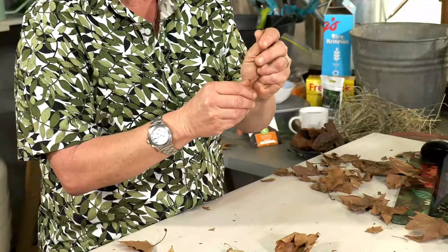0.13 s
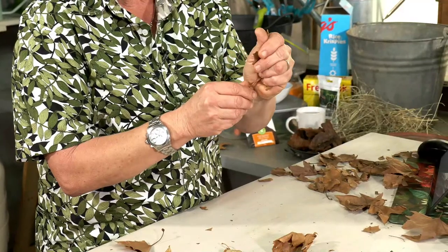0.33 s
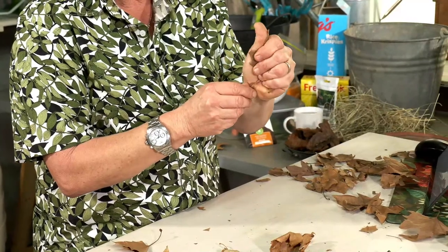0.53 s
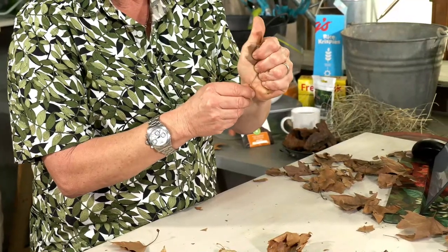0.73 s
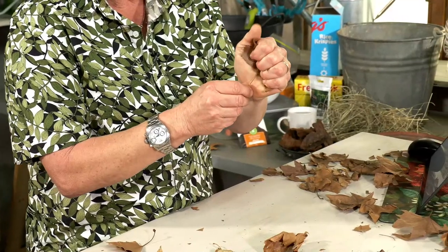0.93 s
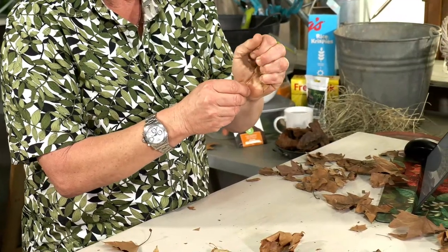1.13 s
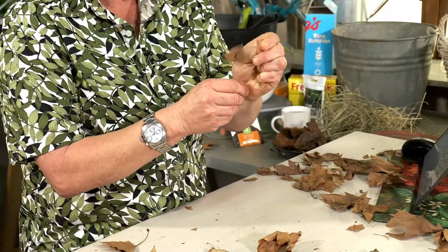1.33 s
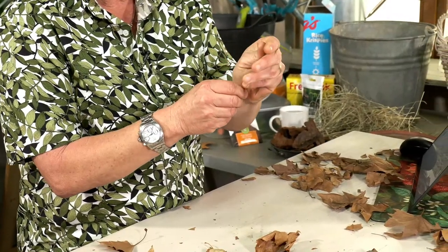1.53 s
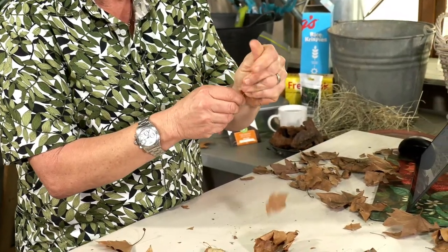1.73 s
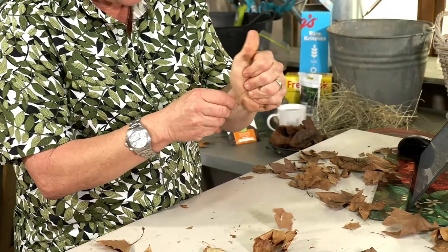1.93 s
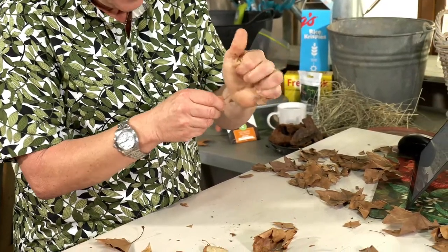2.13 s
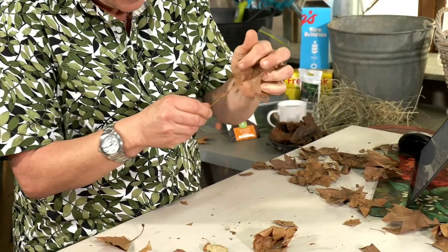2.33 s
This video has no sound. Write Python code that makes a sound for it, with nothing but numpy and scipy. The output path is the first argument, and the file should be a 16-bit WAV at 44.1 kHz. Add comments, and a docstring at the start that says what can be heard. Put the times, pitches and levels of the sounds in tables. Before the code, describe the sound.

Crisp, dense crackling of a dry leaf being crumbled by hand in a quiet room.

```python
"""A dry leaf is crushed and torn between the fingers, close to a small microphone in a quiet shed.
From the start, veins and blade snap over a dense fine crackle and faint hiss; each snap is a quick run of
fractures that rings the brittle leaf for a few ms. The snaps thin out after 0.65 s, bunch again near
1.1 s and 1.7 s and stop by 2.3 s; the crackle fades, with a last small break at 2.45 s.
Throughout, the microphone chain adds a dull overload pop per snap and a soft thump as the treble swells."""
import sys
import numpy as np
from scipy import signal
from scipy.fft import rfft, irfft
from scipy.io import wavfile

SR = 44100
rng = np.random.default_rng(int(sys.argv[2]) if len(sys.argv) > 2 else 0)


def master(y):
    """Save y as 16-bit WAV."""
    cut = np.clip(np.atleast_2d(y).T, -1, 1)
    pcm = np.round(cut * 32767)  # scale
    wavfile.write(sys.argv[1], SR, pcm.astype(np.int16))


N = 109059

# room and microphone noise spectrum: (frequency [Hz], relative density [dB])
HISS_SPECTRUM = [(35, -38), (60, 5), (371, -6.5), (566, -8.5), (698, -9), (1740, -11), (3040, -15.5),
                 (12100, -18.5), (16000, -9.5)]
# modes of the stiff leaf and cupped hand: (frequency [Hz], gain [dB])
LEAF_MODES = [(1400, -13.5), (1750, -4.5), (2100, -1.5), (2600, -3.5), (3000, -0.5), (3400, -4),
              (3900, -1.5), (4500, 2.5), (5100, 0.5), (5700, 4.5), (6300, -7), (7050, -2), (7900, -9.5),
              (9000, -1.5), (10000, 0.5), (10900, 0.5), (11800, 1), (12800, 2.5), (13700, 0.5),
              (14600, -1.5)]
GROUP_EDGES_HZ = [3200, 7200, 11300]   # mode groups: low | middle | upper | top
# even crackle level per mode group: (time [s], low [dB], middle [dB], upper and top [dB])
CRACKLE_LEVELS = [(0.0, -44, -46, -44.5), (0.026, -47, -41, -36.5), (0.109, -53.5, -54, -58),
                  (0.134, -40.5, -40, -30.5), (0.247, -52, -53.5, -50), (0.373, -56, -56, -55),
                  (0.399, -56, -51.5, -43.5), (0.51, -55.5, -56, -52), (0.609, -57, -52.5, -45.5),
                  (0.663, -53.5, -54.5, -39.5), (0.725, -62, -59, -54.5), (0.8, -64.5, -58.5, -46),
                  (0.944, -67, -61, -48), (1.013, -86, -73, -55), (1.032, -56.5, -49.5, -39.5),
                  (1.237, -58, -51, -47), (1.347, -53, -48, -44), (1.455, -69.5, -60, -57),
                  (1.509, -58, -48.5, -48), (1.585, -60, -55.5, -48), (1.722, -51.5, -39, -34),
                  (1.774, -50, -44.5, -50), (1.841, -49.5, -46.5, -40), (2.044, -83, -61.5, -55),
                  (2.094, -62.5, -55, -46), (2.172, -60, -51.5, -49), (2.19, -55.5, -47, -45),
                  (2.258, -46, -41.5, -43), (2.265, -58.5, -54, -49.5), (2.472, -87.5, -82, -71.5)]
# small breaks, each starting a flurry of cracks: (time [s], flare over the crackle [dB])
SMALL_BREAKS = [(0.1889, 22), (0.2178, 17), (0.2252, 15), (0.2566, 5), (0.3203, 21), (0.363, 10.0),
                (0.385, 17), (0.4428, 13), (0.4637, -6), (0.4837, 14), (0.5052, 16), (0.5335, 7),
                (0.5965, 23), (0.6563, 15), (0.705, -6), (0.7423, 18), (0.752, 21), (0.7568, 12),
                (0.7918, 19), (0.809, 7), (0.8367, 12.0), (0.8406, 0), (0.8539, -1), (0.86, 4),
                (0.897, 15.0), (0.9467, 19), (1.0333, 13), (1.0568, 15), (1.077, 21.5), (1.1523, 21),
                (1.159, 11.0), (1.1671, 18), (1.211, 12), (1.2224, 14), (1.2644, 17.5), (1.2827, 6),
                (1.2894, 10), (1.3394, 13.0), (1.3512, 16), (1.3569, 12.0), (1.3743, 11.5), (1.3887, 5),
                (1.3909, 15.0), (1.4317, 15), (1.4594, 19), (1.487, 17.5), (1.5019, 23), (1.5528, 11.0),
                (1.6305, 17), (1.647, 19), (1.671, 17.5), (1.6755, 16.5), (1.751, 11), (1.8418, 13),
                (1.8524, 9), (1.8783, 17), (1.8938, 13), (1.9502, 10), (1.9568, 19), (1.9649, 15.5),
                (1.9737, 17), (1.9786, 6), (2.0284, 18), (2.0906, 16), (2.1105, 8), (2.12, 9.0),
                (2.163, 10.0), (2.2086, 10), (2.227, 8), (2.2366, -3), (2.2993, 19), (2.3269, 15),
                (2.3357, 8.0), (2.352, 16), (2.454, 27.5)]
# vein and blade snaps, relative levels: (time [s], overload pop [dB], low [dB], low peak [Hz],
# middle [dB], middle peak [Hz], upper [dB], top [dB])
SNAP_EVENTS = [(0.0168, -34, -51, 1800.0, -17, 4500, -11, -14),
               (0.02, -67, -9.5, 2800, -9.5, 3200.0, -44, -21),
               (0.0945, -47, -23, 3230, -18.5, 3400.0, -27, -24),
               (0.1105, -41, -21, 2060, -18.5, 4800, -16.5, -27),
               (0.1263, -61, -33, 3000.0, -19, 3320, -30, -24),
               (0.134, -39, -18, 2700.0, -15.5, 3430, -23, -37),
               (0.1388, -63, -40, 3220, -11, 3300.0, -35, -31),
               (0.1422, -56, -37, 2160, -12, 3750, -42, -31),
               (0.1614, -30.5, -13.5, 1890, -21.5, 4260, -17, -20),
               (0.1681, -45, -23, 3160, -15, 3380, -40, -35),
               (0.1725, -43, -36, 3200.0, -17, 4000, -26, -35),
               (0.198, -30, -17.5, 3260, -17.5, 4200.0, -18.5, -15.5),
               (0.2014, -63, -25, 2680, -27, 3400.0, -38, -17.5),
               (0.221, -44, -33, 3000.0, -28, 6160, -43, -30),
               (0.2755, -36, -44, 3200.0, -27, 3300.0, -46, -23.5),
               (0.2777, -60, -35, 3200.0, -21, 3330, -36, -27),
               (0.314, -36, -26.5, 1800.0, -27.5, 6100.0, -22, -21),
               (0.342, -47.5, -53, 3100.0, -30, 6100.0, -41.0, -26),
               (0.3529, -45, -52, 2700.0, -20.5, 3500.0, -30, -18.5),
               (0.3576, -59, -28, 2450, -23, 4370, -20.5, -41),
               (0.3953, -29.5, -12.5, 1850, -11.5, 4500, -14, -23),
               (0.4254, -52, -34, 2600.0, -29.5, 4300.0, -39.0, -25),
               (0.5207, -46, -42, 3200.0, -29.5, 6100.0, -23.5, -27),
               (0.5276, -59, -18.5, 2510, -23, 3200.0, -21.5, -27),
               (0.552, -33, -13, 1300.0, -23, 4250, -24, -20.5),
               (0.557, -56, -56, 3200.0, -27, 6400.0, -26, -26),
               (0.575, -39.5, -24, 1950, -28.5, 4500.0, -18.5, -16.5),
               (0.5798, -70, -48.0, 2900.0, -26.5, 5800.0, -38, -23),
               (0.601, -50, -26, 1490, -21, 6300.0, -18.5, -24),
               (0.606, -54, -25.5, 2950, -45, 5600.0, -19, -45),
               (0.6116, -53, -27, 1600.0, -43, 6100.0, -28, -24),
               (0.6268, -48, -44, 3200.0, -28, 3200.0, -25, -43),
               (0.6484, -42, -19.5, 1770, -25.5, 4270, -27, -17),
               (0.698, -53, -57, 3270, -31, 4100, -32, -38), (0.712, -52, -59, 3000.0, -43, 4370, -52, -29),
               (0.778, -39, -37, 1800.0, -32.5, 5960, -23.5, -19.5),
               (0.881, -60, -41, 1970, -41.5, 5300.0, -48, -24),
               (0.884, -70, -33, 1700.0, -40, 5700.0, -44, -26),
               (0.9502, -59, -35.5, 1790, -36.5, 5700, -32, -29),
               (1.0162, -57, -28, 1800.0, -35, 3200.0, -26, -36),
               (1.0224, -37, -10, 1860, -11, 3690, -16, -20),
               (1.05, -36, -23, 1300.0, -22, 5170, -33.0, -26),
               (1.067, -40, -33, 2170, -28, 6400.0, -17, -25),
               (1.0726, -46, -16, 1400.0, -16.5, 5300, -16, -46),
               (1.0907, -43, -53, 3200.0, -21, 4160, -20, -44),
               (1.1116, -41.5, -50, 1800.0, -20, 4430, -21.5, -40),
               (1.1198, -51, -30, 1900.0, -28, 4300.0, -45, -19),
               (1.1351, -48, -51, 3200.0, -26, 4200.0, -46, -21),
               (1.14, -35.5, -45, 3220, -25.5, 4150, -16.5, -19),
               (1.1963, -55, -28, 3200.0, -29.5, 4500.0, -40.0, -25),
               (1.2417, -43.5, -61, 2000.0, -43, 5450, -32, -19.5),
               (1.2525, -60, -56, 2700.0, -44, 5900.0, -20.5, -24),
               (1.255, -47, -52, 2900.0, -23, 5700, -22, -39),
               (1.2772, -36.5, -61, 3200.0, -21, 5700.0, -24, -23),
               (1.4033, -56, -70, 2800.0, -27, 5200, -22.5, -46),
               (1.509, -79, -24, 2640, -24.5, 6000.0, -37, -31),
               (1.5698, -51, -23.5, 2660, -26, 6150, -20, -47),
               (1.6072, -51, -43, 2100.0, -35, 4300.0, -44, -27),
               (1.6123, -40.5, -36, 3100.0, -28, 5700.0, -17.5, -41),
               (1.6545, -43.5, -42, 2700, -35, 5900, -26, -33),
               (1.6877, -47.5, -51, 3200.0, -24, 5700.0, -43, -42),
               (1.6965, -31.5, -14, 3040, -17, 5700, -38, -24),
               (1.7135, -55, -40, 2000.0, -40, 5200.0, -21, -19.5),
               (1.7211, -63, -21, 3200.0, -42, 4900.0, -16.5, -35),
               (1.7245, -42.5, -16.5, 3140, -43, 5500.0, -13.5, -24),
               (1.7299, -48, -17, 3150, -6.5, 5400, -14, -39),
               (1.7456, -47, -45, 2900.0, -14.5, 5760, -29, -28),
               (1.7751, -58, -16.5, 2160, -23, 4730, -34, -51),
               (1.7861, -53, -50, 3200.0, -25, 4500.0, -40, -35),
               (1.8289, -56, -53, 3220, -23, 5700.0, -36, -38),
               (1.8708, -46, -33, 2900.0, -26.5, 6440, -57, -28),
               (1.907, -44.5, -38, 3230, -27.5, 3340, -43, -23),
               (1.945, -49.5, -39, 1900.0, -30, 5900, -30, -23),
               (1.9991, -57, -34, 1980, -34, 3820, -27, -37),
               (2.14, -74, -59, 2000.0, -25.5, 3930, -56, -34),
               (2.18, -76, -16.5, 2400.0, -16.5, 3180, -44, -26.5),
               (2.219, -61, -59, 2100.0, -35, 4800, -43, -44),
               (2.2478, -47, -40, 2040, -23.5, 3970, -52, -26),
               (2.2557, -62, -58, 2100.0, -24, 3900.0, -65, -23)]


def amp(db):
    return 10 ** (np.asarray(db) / 20)


def butter(x, hz, kind, order):
    return signal.sosfilt(signal.butter(order, hz, kind, fs=SR, output="sos"), x)


def impulses(time_s, heights):
    return np.bincount((time_s * SR).astype(int).ravel(), heights.ravel(), N)[:N]


def hiss():
    """Steady room and microphone noise, unit RMS."""
    hz, db = np.transpose(HISS_SPECTRUM)
    bins_hz = np.maximum(np.fft.rfftfreq(N, 1 / SR), 1)
    shape = amp(np.interp(np.log(bins_hz), np.log(hz), db))
    noise = irfft(rfft(rng.standard_normal(N)) * shape, N)
    return noise / np.sqrt(np.mean(noise ** 2))


def shed_reverb(x, t60_s=0.21):
    """Short diffuse tail from table and walls."""
    t = np.arange(int(.3 * SR)) / SR
    tail = rng.standard_normal(len(t)) * amp(-60 * t / t60_s) * (t > .002)
    return signal.fftconvolve(x, tail / np.linalg.norm(tail))[:N]


def leaf_ring(clicks, hz):
    """One leaf mode: a quick resonator swings it in, a slower one decays. Higher modes die sooner."""
    t60_s = 0.0065 * (hz / 1e3) ** -0.46
    w = 2 * np.pi * hz / SR
    quick, slow = amp(-60 / (np.array([0.39 * t60_s, t60_s]) * SR))
    gain = (1 - quick ** 2) / 2
    swung = signal.lfilter([gain, 0, -gain], [1, -2 * quick * np.cos(w), quick ** 2], clicks + 1e-18)
    return signal.lfilter([0, np.sin(w)], [1, -2 * slow * np.cos(w), slow ** 2], swung)


def flurries(breaks, t60_s):
    """Envelope: each break flares at once and dies away."""
    return signal.lfilter([1], [1, -amp(-60 / (t60_s * SR))], breaks)


def crackle(cracks_per_s=5000, faint_breaks_per_s=150, mode_share=0.4, low_cut_hz=1580):
    """Tiny cracks run on evenly and flare at each small break; each excites only some modes."""
    faint = (rng.random(N) < faint_breaks_per_s / SR) * amp(3) * rng.random(N) * 2
    break_s, break_db = np.transpose(SMALL_BREAKS)
    breaks = impulses(break_s, amp(break_db))
    envelopes = np.array([1 + flurries(faint, t60_s=0.024), flurries(breaks, t60_s=0.0078)])
    onsets = rng.random(N) < cracks_per_s / SR
    size_db = np.minimum(rng.exponential(4, N), 16)
    cracks = onsets * envelopes * amp(size_db)
    opening = np.array([np.zeros(N), breaks * amp(2)])   # one firm crack opens each small break
    groups = np.zeros((3, 2, N))   # mode group, even / flared, sample
    for hz, db in LEAF_MODES:
        coupling = (rng.random(N) < mode_share) * rng.standard_normal(N)
        clicks = cracks * coupling + opening * rng.choice([-1, 1], N)
        groups[np.searchsorted(GROUP_EDGES_HZ[:2], hz)] += leaf_ring(amp(db) * clicks, hz)
    groups = butter(groups, low_cut_hz, "high", order=4)
    time_s, *levels_db = np.transpose(CRACKLE_LEVELS)
    t = np.arange(N) / SR
    return sum(amp(np.interp(t, time_s, db)) * (even + flared) / np.std(even)
               for db, (even, flared) in zip(levels_db, groups))


def overload_pops(gain_db=7, cutoff_hz=1680):
    """Each snap overloads the microphone chain, giving one short, dull pop."""
    time_s, pop_db = np.transpose(SNAP_EVENTS)[:2]
    pulse = butter(np.arange(200) == 0, cutoff_hz, "low", order=2)
    return -np.convolve(impulses(time_s, amp(pop_db + gain_db)), pulse / pulse.max())[:N]


def fracture_runs(start_s, count=7, mean_gap_s=0.00026, loss_db=1.5, first_boost_db=3):
    """A fading run of fractures per snap, the first strongest: times and signed sizes."""
    gap_draw, size_draw, sign_draw = rng.random((len(start_s), 3, count)).swapaxes(0, 1)
    delay_s = 2 * mean_gap_s * (np.cumsum(gap_draw, axis=1) - gap_draw[:, :1])
    index = np.arange(count)
    jitter_db = 1 - 2 * size_draw
    size_db = jitter_db - loss_db * index + first_boost_db * (index == 0)
    return start_s[:, None] + delay_s, amp(size_db) * np.sign(sign_draw - .5)


def snaps(gain_db=2.5, mode_spread_db=2.5, focus_db_per_octave=26):
    """Fracture runs ring the leaf; low and middle modes ring most near each snap's peak pitches."""
    time_s, _, low_db, low_hz, middle_db, middle_hz, upper_db, top_db = np.transpose(SNAP_EVENTS)
    fracture_s, sizes = fracture_runs(time_s)
    colour_db = mode_spread_db * rng.standard_normal((len(time_s), len(LEAF_MODES), sizes.shape[1]))
    ringing = np.zeros(N)
    for k, (hz, mode_db) in enumerate(LEAF_MODES):
        focus_db = np.maximum(low_db - focus_db_per_octave * np.abs(np.log2(hz / low_hz)),
                              middle_db - focus_db_per_octave * np.abs(np.log2(hz / middle_hz)))
        group_db = (focus_db, focus_db, upper_db, top_db)[np.searchsorted(GROUP_EDGES_HZ, hz)]
        blows = sizes * amp(colour_db[:, k])
        coherent_power = np.abs(np.sum(blows * np.exp(2j * np.pi * hz * fracture_s), axis=1)) ** 2
        swing = np.sqrt((coherent_power + np.sum(blows ** 2, axis=1)) / 2)
        scale = amp(group_db + mode_db + gain_db) / swing
        ringing += leaf_ring(impulses(fracture_s, blows * scale[:, None]), hz)
    # whole leaf to crumbs: smaller pieces radiate less low end
    whole, crumbs = (butter(ringing, hz, "high", order=4) for hz in (1400, 1800))
    return whole + (crumbs - whole) * np.arange(N) / N


def scene():
    """Leaf, pops, shed tail and hiss; mono."""
    direct = snaps() + crackle() + overload_pops()
    return (direct + amp(-15) * shed_reverb(direct) + amp(-59) * hiss())[None]


def record(dry):
    """Rectified treble leaks in as a slow swell; the low cut turns it into a thump. The top is cut."""
    leak_db, top_cut_hz = 8, 16200
    treble = butter(dry, hz=7300, kind="high", order=4)
    swell = butter(np.abs(treble), hz=27.7, kind="low", order=2)
    thumped = butter(dry + amp(leak_db) * swell, hz=27.8, kind="high", order=3)
    return signal.sosfilt(signal.cheby2(12, 50, top_cut_hz, fs=SR, output="sos"), thumped)


dry = scene()
out = record(dry)
master(out)
```